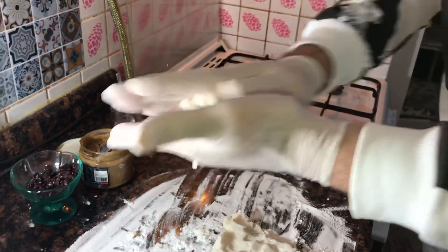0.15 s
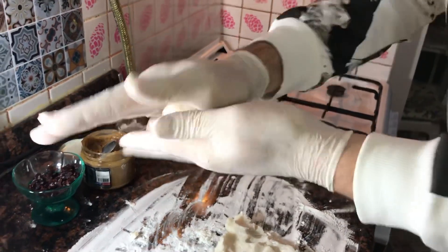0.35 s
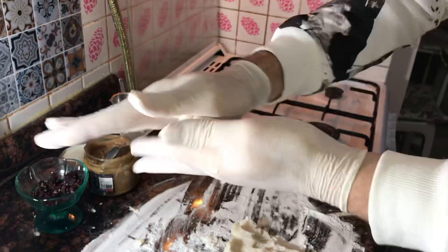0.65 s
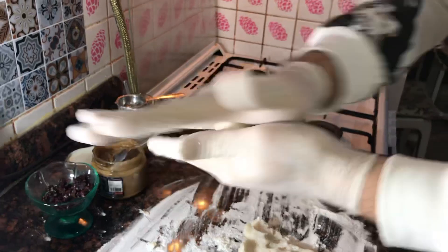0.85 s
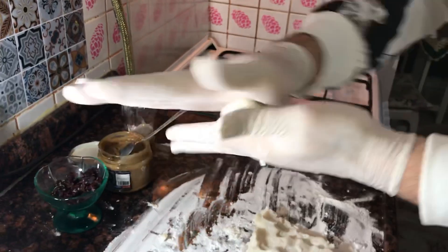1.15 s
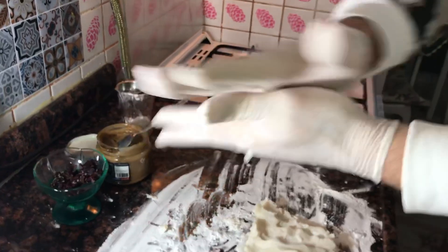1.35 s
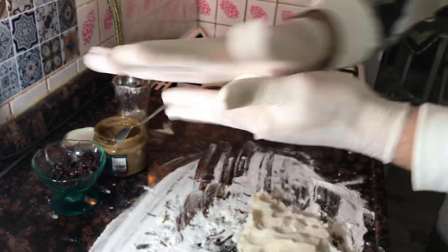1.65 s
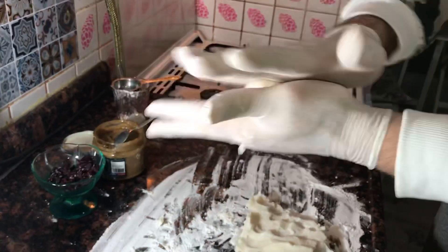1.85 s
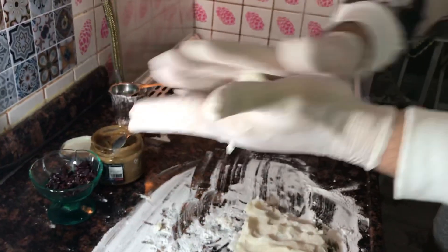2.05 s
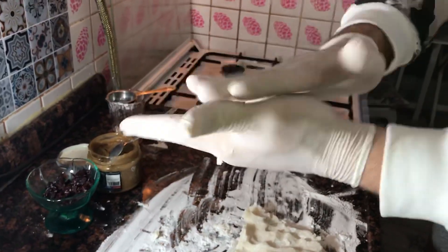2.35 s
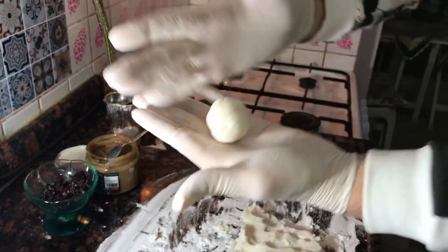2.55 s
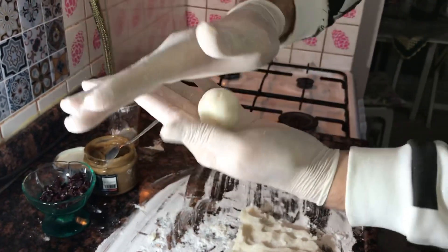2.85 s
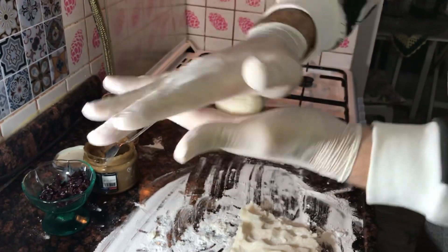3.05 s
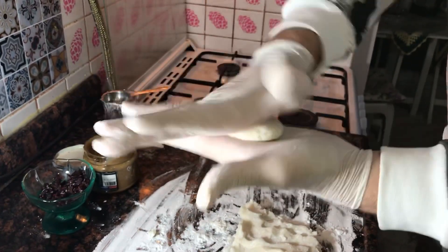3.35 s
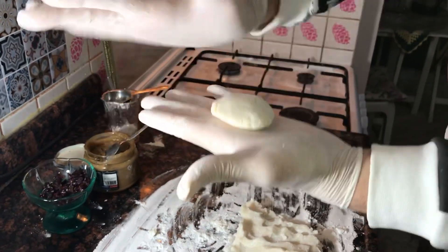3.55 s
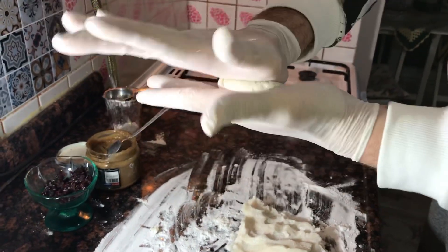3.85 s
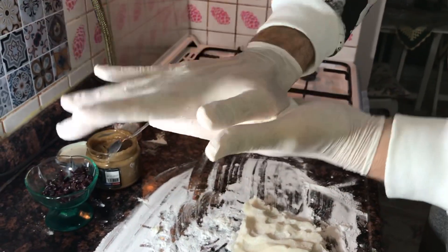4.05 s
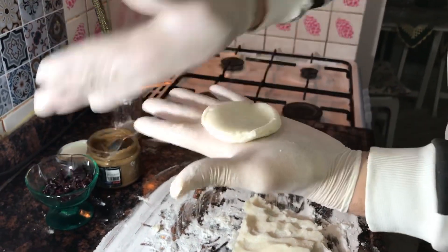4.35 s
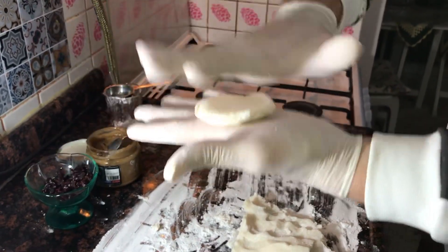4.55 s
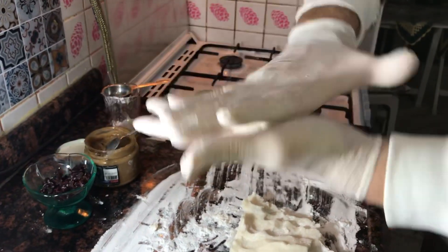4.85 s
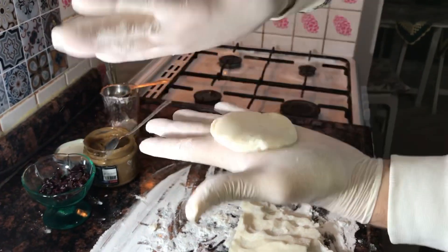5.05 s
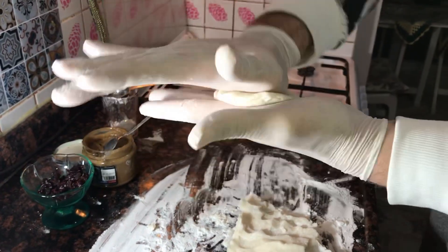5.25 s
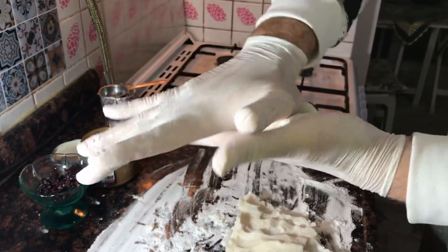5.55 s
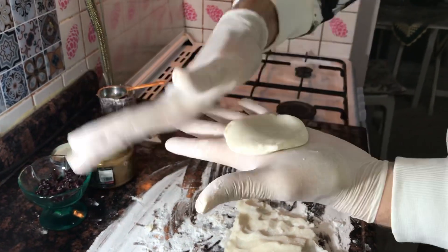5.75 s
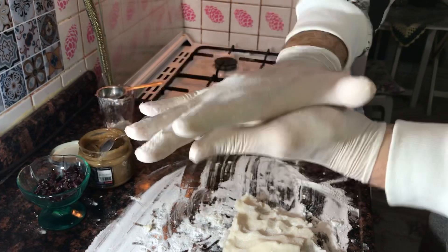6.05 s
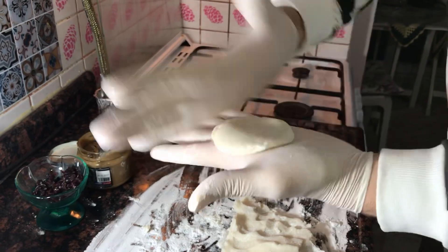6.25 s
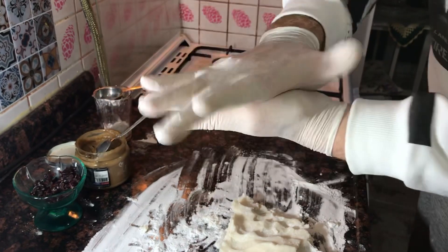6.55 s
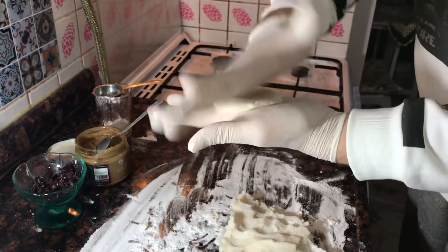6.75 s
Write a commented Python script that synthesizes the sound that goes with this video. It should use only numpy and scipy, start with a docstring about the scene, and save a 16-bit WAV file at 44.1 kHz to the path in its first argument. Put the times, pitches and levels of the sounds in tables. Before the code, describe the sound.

Thin rubber gloves softly rustle against sticky dough, followed by light pats and small peeling snaps in a quiet room.

```python
"""Gloved hands working dough

A small tiled kitchen, one microphone close to the hands. Thin rubber gloves roll a ball of sticky
dough, rubbing, clinging and peeling away in fine crackle, then pat it flat, each pat trapping a
pocket of air between the palms. Behind them lie quiet room noise, a mains hum and a low drone
that slowly sinks and fades."""
import sys
import numpy as np
from scipy import signal
from scipy.fft import rfft, irfft, next_fast_len
from scipy.io import wavfile
from scipy.ndimage import uniform_filter1d, map_coordinates

SR = 44100
rng = np.random.default_rng(int(sys.argv[2]) if len(sys.argv) > 2 else 0)


def unload_wav(signal):
    """Save mono or channel-first audio to the path in sys.argv[1] as 16-bit WAV at rate SR, clipped to [-1, 1]."""
    wavfile.write(
        sys.argv[1],
        SR,
        np.round(np.clip(np.atleast_2d(signal).T, -1, 1) * 32767).astype(np.int16),
    )


N = 304718
TIME = np.arange(N) / SR
TOP_HZ = 15950  # the microphone's band limit


# the rolling hand turns back: (time [s])
ROLL_TURNS = [-.08, .15, .375, .63, .905, 1.27, 1.45, 1.715, 1.965, 2.19, 2.46]
# the upper glove slides as it presses or lifts off: (start [s], length [s], level [dB])
SLIDES = [(0, 0.15, -50.5), (.65, 0.038, -53), (1.04, .08, -54), (1.795, .03, -56), (2.93, 0.095, -62),
          (3.145, 0.11, -58), (3.335, 0.15, -63.5), (3.75, 0.13, -73), (4.135, 0.064, -50),
          (4.22, 0.022, -54), (4.64, 0.075, -61), (4.795, 0.037, -55.5), (5.31, 0.13, -62),
          (5.515, 0.14, -53), (6.12, 0.12, -59.5), (6.685, 0.022, -57)]
ROLL_END_S = 2.43

def friction_db():
    """The rub drops at each turn of the hand and eases as the ball gets smooth; single slides join it."""
    start_db, turn_db = -53, -9
    ease, rise, fall = 3.0, 315, 222  # dB/s
    stroke = np.interp(TIME, ROLL_TURNS, np.arange(len(ROLL_TURNS)))
    slowness = (1 - np.abs(np.sin(np.pi * stroke))) ** 1.66
    rolling = start_db - ease * TIME + turn_db * slowness
    rolling -= fall * np.maximum(TIME - ROLL_END_S, 0)
    return np.maximum(rolling, held(SLIDES, rise, fall))


# rubber sliding on dough, heard close: (frequency [Hz], level [dB])
SLIDE_SPECTRUM = [(60, -42.5), (200, -42.5), (550, -2), (900, -4), (2000, -1), (4200, 1), (5000, -1),
                  (6000, 0), (7500, -3.5), (9000, -1), (10300, -5.5), (12300, -2), (16000, -4.5)]

def rubbing():
    """The glove slides on the dough in a fine rustle of little catches."""
    catches = coloured(grains(N, per_s=2400, spread_db=3.5), SLIDE_SPECTRUM)
    rustle = patchy(catches, depth_db=2.5)
    grip_db = 1.8 * wobble(55)
    return rustle * amp(friction_db() - 3.0 + grip_db)


def clings(count=32, half_s=0.0039, tilt_db=-0.5):
    """The rolling ball clings and lets go at random moments: faint peels that follow the rub's level."""
    times = ROLL_END_S * (np.arange(count) + rng.random(count)) / count
    levels = np.interp(times, TIME, friction_db())
    return [(s, db, half_s, tilt_db) for s, db in zip(times, levels)]


# glove rubber letting go: (frequency [Hz], level [dB])
RUBBER_SPECTRUM = [(60, -58), (200, -12), (450, -26), (900, -13.5), (2000, -4.5), (4200, 2.5), (5000, -2.5),
                   (5800, 2), (7500, -2.5), (9000, 0), (10300, -4.5), (12300, 2), (16000, -6.5)]
# rubber peels off dough: (peak time [s], level [dB], half length [s], brightness [dB/octave])
PEELS = [(0.052, -37, 0.0024, -1.5), (0.194, -44.5, 0.0074, 4), (0.259, -43, 0.018, 1.5),
         (0.324, -50, 0.017, -3), (0.423, -45.5, 0.014, 1.5), (0.477, -44, 0.0069, 1.5),
         (0.518, -48.5, 0.011, 0.5), (0.56, -42, 0.013, 5), (0.748, -48, 0.01, 4),
         (0.775, -42.5, 0.011, -1.5), (0.833, -51, 0.0052, 5), (0.951, -46, 0.0022, 10),
         (1.23, -51.5, 0.0066, -0.5), (1.503, -46, 0.0042, 3.5), (1.668, -57, 0.011, -3.5),
         (1.754, -54, 0.0056, 3), (1.865, -51, 0.0053, 1), (1.91, -52.5, 0.0051, -5.5),
         (2.137, -54, 0.019, -0.5), (2.234, -48.5, 0.008, 1.5), (2.257, -39, 0.0076, 6.5),
         (2.34, -55, 0.011, 2.5), (2.41, -61, 0.0066, 20), (2.482, -66, 0.011, 3),
         (2.887, -57.5, 0.0064, -2), (3.327, -48.5, 0.0085, -1), (3.353, -48.5, 0.016, 1),
         (3.645, -58.5, 0.0054, -5.5), (4.119, -47.5, 0.011, -2.5), (4.17, -44, 0.0043, 4),
         (4.288, -60, 0.0065, 14), (4.845, -49, 0.0063, -3), (4.8585, -26, 0.0021, 6),
         (5.509, -53.5, 0.0079, 8), (5.59, -41.5, 0.0059, 3), (5.637, -45.5, 0.017, 2.5),
         (6.152, -44, 0.0043, 0), (6.178, -48, 0.0045, 12), (6.207, -49, .002, 11),
         (6.219, -43, 0.0037, -1.5), (6.691, -54.5, 0.0055, -5.5), (6.711, -53.5, 0.0084, 8)]

def peels():
    """The contact patch tears open in a swell of crackle; fine threads of dough sound brighter."""
    out, t = np.zeros(N), np.arange(-SR // 10, SR // 10) / SR
    for s, db, half_s, tilt_db in PEELS + clings():
        breaks = grains(len(t), per_s=14000, spread_db=3.0)
        crackle = patchy(coloured(breaks, RUBBER_SPECTRUM, tilt_db), depth_db=3.0)
        swell = 1 / np.cosh(np.clip(1.38 * t / half_s, -50, 50))
        add(out, s + t[0], amp(db) * crackle * swell)
    return out


# taut rubber lets go at once: (time [s], peak [dB], brightness [dB/octave])
SNAPS = [(0.05, -45, -10), (0.24, -35.5, -7), (.396, -39, -4.5), (.765, -31, -2), (.951, -41, 6),
         (1.502, -40, 1.5), (2.2255, -39, 4), (2.2517, -37, -1), (3.3679, -28, -1), (4.105, -39, -3.5),
         (4.151, -21, -3), (4.181, -28, -3), (4.858, -13, -3), (4.892, -31.5, -7.5), (5.585, -36.5, -8.5),
         (5.655, -25, -6.5), (6.217, -18, 17.5), (6.503, -18.5, 1.5), (6.8332, -42.5, -13)]

def snaps(t60=0.0072):
    """The last bond breaks and the rubber flicks back within a millisecond or two."""
    out, t = np.zeros(N), np.arange(SR // 20) / SR
    middle = len(t) // 2
    for s, db, tilt_db in SNAPS:
        burst = rng.standard_normal(len(t)) * amp(-60 * t / t60)
        flick = coloured(np.roll(burst, middle), RUBBER_SPECTRUM, tilt_db)
        add(out, s - t[middle], amp(db) * flick / np.abs(flick).max())
    return out


# air between the palms: (frequency [multiple of the lowest mode], level [dB])
POCKET_MODES = [(1, -4.5), (1.3, -6), (1.74, -12)]

def air_pocket(hz, lowest_hz, step_db, q=5):
    """Response of the trapped air, ringing in a few broad modes."""
    return sum(amp(db + k * step_db) * np.abs(resonance(hz, m * lowest_hz, m * lowest_hz / q)) ** 2
               for k, (m, db) in enumerate(POCKET_MODES))


# a gloved palm's slap: (frequency [Hz], level [dB])
PALM_SPECTRUM = [(60, -45), (220, -4), (500, -9.5), (850, 2), (1200, -3), (1650, 2.5), (2000, -1),
                 (4500, -10.5), (6000, -12.5), (8000, -10.5), (16000, -23)]
# palm meets dough: (time [s], slap level [dB], finger lead [s], pocket pitch [Hz], pocket gain [dB],
# step per higher mode [dB], thump peak [dB], thump pitch [Hz], slap t60 [s])
PATS = [(4.562, -33.5, 0.0068, 2840, 7, 0, -38, 136, 0.034),
        (4.859, -22, 0.0074, 3280, 13.5, 2.5, -38.5, 330, 0.028),
        (5.173, -40, 0.0053, 2420, 10.5, -2, -66, 200, 0.01),
        (5.926, -34.5, 0.0048, 1660, 5, -5.5, -30.5, 227, 0.041),
        (6.499, -29.5, 0.0049, 2420, 10.5, -0.5, -35, 202, 0.052),
        (6.68, -53, 0.0023, 2800, 18, 1, -59, 200, .09)]

def pats(fingers_db=-16, shut_s=0.019, push_s=0.00047, dough_q=0.8):
    """Fingers touch first, then the palm shuts on an air pocket and gives the soft dough a dull push."""
    out, t = np.zeros(N), np.arange(-SR // 50, SR // 5) / SR
    for s, db, lead_s, pocket_hz, pocket_db, step_db, thump_db, thump_hz, t60 in PATS:
        pocket = lambda hz: amp(pocket_db) * air_pocket(hz, pocket_hz, step_db)
        noise = rng.standard_normal(len(t))
        slap = unit(filtered(noise, lambda hz: amp(along(PALM_SPECTRUM, hz)) + pocket(hz)))
        closing = (t > -lead_s) * np.maximum(amp(fingers_db), amp(-60 * np.abs(t) / shut_s))
        slap *= np.where(t < 0, closing, amp(-60 * np.abs(t) / t60))
        push = np.exp(-(t / push_s) ** 2)
        thump = filtered(push, lambda hz: resonance(hz, thump_hz, thump_hz / dough_q))
        add(out, s + t[0], amp(db) * slap + amp(thump_db) * thump / np.abs(thump).max())
    return out


# the rip of a lifting palm: (frequency [Hz], level [dB])
TEAR_SPECTRUM = [(60, -45), (300, -18), (650, -12), (900, -6.5), (1400, -2), (2200, 2.5), (3200, -3.5),
                 (4200, 1.5), (6100, 1), (7200, -6), (9000, -6), (10400, -7.5), (12300, -2), (16000, -12)]
# the whole palm tears off the dough: (peak time [s], level [dB], rise [s], fall [s], rasp [Hz])
LIFTS = [(4.152, -35, 0.0087, 0.023, 5600), (4.199, -38, 0.011, 0.0064, 4620),
         (5.632, -41, 0.015, 0.015, 2150), (5.654, -37.5, 0.0075, 0.0085, 4800)]

def lifts(rasp_db=-5, rasp_q=6.8):
    """The palm comes off in one dense rip that rasps at the pitch of the stretched rubber."""
    out, t = np.zeros(N), np.arange(-SR // 10, SR // 5) / SR
    for s, db, rise, fall, rasp_hz in LIFTS:
        rip = coloured(grains(len(t), per_s=15000, spread_db=4.0), TEAR_SPECTRUM)
        rip = filtered(rip, lambda hz: 1 + amp(rasp_db) * resonance(hz, rasp_hz, rasp_hz / rasp_q))
        swell = np.exp(-np.abs(t) / np.where(t < 0, rise, fall))
        add(out, s + t[0], amp(db) * patchy(rip, depth_db=2.0) * swell)
    return out


# tiny air pockets burst under the rubber: (time [s], level [dB], pitch [Hz], ring t60 [s])
POPS = [(0.24, -43.5, 1700, 0.05), (0.324, -37, 4100, .009), (0.396, -42.5, 4670, .012),
        (.471, -38, 654, 0.0058), (0.765, -39.5, 2320, 0.022), (1.858, -41.5, 6100, 0.0082),
        (2.883, -49.5, 3220, 0.042), (3.329, -33, 4100, 0.0096), (3.3706, -26.5, 3150, 0.0042),
        (3.775, -51.5, 9500, .012), (3.804, -51.5, 8900, 0.011), (4.15, -45.5, 675, 0.051),
        (4.2, -43.5, 400, 0.014)]

def pops(count=60):
    """Each air pocket ticks and rings briefly; rubbing bursts faint ones at random."""
    out, t = np.zeros(N), np.arange(SR // 12) / SR
    rub_db = friction_db()
    faint = [(when * TIME[-1], rub_db[int(when * N)] + 3.0 + 7 * force, 2000 * 5.1 ** pitch, 0.005)
             for when, force, pitch in rng.random((count, 3))]
    for s, db, hz, t60 in POPS + faint:
        ring = np.sin(2 * np.pi * hz * t) * amp(-60 * t / t60)
        tick = 0.23 * rng.standard_normal(len(t)) * amp(-60 * t / 0.016)
        add(out, s, amp(db) * (ring + tick))
    return out


# bands of thin hiss: (centre [Hz], width [Hz], level [dB])
HISS_BANDS = [(2400, 650, -74.5), (5950, 500, -82)]

def thin_hiss(start_s=2.54, end_s=2.83):
    """A faint hiss in two narrow bands while the hands are apart."""
    hiss = np.zeros(N)
    for centre, width, db in HISS_BANDS:
        band = filtered(rng.standard_normal(N), lambda hz: resonance(hz, centre, width) ** 2)
        hiss += amp(db) * unit(band)
    return hiss * amp(held([(start_s, end_s - start_s, 0)], rise=90, fall=90))


# decay of the tiled room: (frequency [Hz], t60 [s])
KITCHEN_DECAY = [(150, 0.24), (600, 0.25), (2000, 0.26), (4000, 0.25), (8000, 0.21), (15000, 0.15)]

def kitchen(direct, early_db, tail_db):
    """Counter and tiles send the microphone a few quick echoes, then a short bright tail."""
    hz, t, bands = signal.stft(rng.standard_normal(SR // 2), SR, nperseg=256)
    decay = amp(-60 * t / along(KITCHEN_DECAY, hz)[:, None])
    tail = signal.istft(bands * decay, SR, nperseg=256)[1]
    colour = [(200, 8.5), (1000, 5.0), (3700, -2.0), (7000, 1.0), (15000, -3.0)]
    tail = filtered(tail, lambda f: amp(along(colour, f)))
    response = amp(tail_db) * tail / np.linalg.norm(tail)
    echo_delays = rng.integers(SR // 600, SR // 70, size=14)
    response[echo_delays] += amp(early_db) * rng.choice([-1, 1], len(echo_delays))
    return direct + signal.fftconvolve(direct, response)[:N]


# the distant drone swells and fades: (time [s], level [dB])
DRONE_LEVEL = [(.35, -64), (1.15, -53), (2.3, -54.5), (3.0, -59.5), (3.9, -63.5), (5.0, -73.5), (5.45, -63),
               (6.2, -77)]
# it drops away briefly: (time [s], level change [dB])
DRONE_DIPS = [(1.44, -15), (2.79, -9), (3.5, -8.5)]

def drone(start_hz=143.9, sink_hz_per_s=2.1, dip_half_s=0.12):
    """A low, slowly sinking tone, like a motor beyond the walls."""
    pitch = start_hz - sink_hz_per_s * TIME + 0.5 * wobble(13)
    phase = 2 * np.pi * np.cumsum(pitch) / SR
    db = np.interp(TIME, *np.transpose(DRONE_LEVEL))
    db += sum(dip * np.exp(-((TIME - s) / dip_half_s) ** 2) for s, dip in DRONE_DIPS)
    return amp(db + 1.3 * wobble(23.22)) * np.sqrt(2) * np.sin(phase)


def mains_hum(hz=49):
    """A low electrical hum in the room, wavering in level and pitch."""
    gain = amp(-70.0 + wobble(3.8))
    return gain * np.sqrt(2) * np.sin(2 * np.pi * hz * TIME + 1.27 * wobble(5.2))


# the quiet kitchen at the microphone: (frequency [Hz], level [dB])
ROOM_SPECTRUM = [(25, -36.5), (40, 5.5), (60, -5), (80, -4), (100, 2), (170, -6), (340, -8), (600, -15.5),
                 (1200, -19.5), (2500, -24.5), (4800, -26.5), (6000, -26.5), (7500, -29.5), (16000, -32)]

def room_tone():
    """Soft, low room noise that drifts slightly in level."""
    drift_db = 0.6 * wobble(2.4)
    return amp(-63.0 + drift_db) * coloured(rng.standard_normal(N), ROOM_SPECTRUM)


def grains(size, per_s, spread_db):
    """Tiny adhesions break at random moments, a few much larger than the rest."""
    breaks = rng.random(size) < per_s / SR
    signs = rng.choice([-1, 1], size)
    return breaks * signs * amp(spread_db * np.minimum(rng.exponential(size=size), 4))


def patchy(x, depth_db):
    """Shifting folds of rubber favour one narrow band after another, each for a moment."""
    bands = signal.stft(x, nperseg=512)[2]
    folds = uniform_filter1d(rng.standard_normal(bands.shape), size=6, axis=0)
    folds = uniform_filter1d(folds, size=5, axis=1)
    return unit(signal.istft(bands * amp(depth_db * unit(folds)), nperseg=512)[1][:len(x)])


def coloured(x, spectrum, tilt_db=0):
    """x with a spectrum, tilted per octave through the mids and treble and free of rumble, at rms 1."""
    octaves = lambda hz: np.log2(np.clip(hz, 700, 11500))
    band = lambda hz: (1 - 1 / (1 + (hz / 33) ** 10)) * (hz < TOP_HZ)
    return unit(filtered(x, lambda hz: band(hz) * amp(along(spectrum, hz) + tilt_db * octaves(hz))))


def filtered(x, response):
    """x through a frequency response."""
    size = next_fast_len(len(x) + 4096)
    return irfft(rfft(x, size) * response(np.fft.rfftfreq(size, 1 / SR)), size)[:len(x)]


def resonance(hz, centre, width):
    """Response of one damped mode."""
    return 1j * hz * width / (centre ** 2 - hz ** 2 + 1j * hz * width)


def held(gestures, rise, fall):
    """Level in dB of gestures that rise, hold and fall, the slopes in dB/s."""
    return np.max([db - rise * np.maximum(s - TIME, 0) - fall * np.maximum(TIME - s - length, 0)
                   for s, length, db in gestures], axis=0)


def wobble(rate):
    """A smooth random curve, rate knots a second."""
    return map_coordinates(rng.standard_normal(4096), [TIME * rate], mode="wrap")


def along(points, hz):
    """A curve read on a log frequency axis."""
    freqs, values = np.transpose(points)
    return np.interp(np.log(hz + 1), np.log(freqs), values)


def amp(db):
    """Decibels to gain."""
    return 10 ** (np.asarray(db) / 20)


def unit(x):
    """x at rms 1."""
    return x / np.sqrt(np.mean(x ** 2) + 1e-20)


def add(track, s, sound):
    """Mix a sound into the track from time s."""
    start = round(s * SR)
    part = sound[max(-start, 0):max(N - start, 0)]
    track[max(start, 0):][:len(part)] += part


def scene():
    """The hands close to the microphone, the tiled kitchen around them, in mono."""
    rolling = kitchen(rubbing() + pops(), early_db=-19.5, tail_db=-9.5)
    peeling = kitchen(peels() + lifts(), early_db=-33, tail_db=-10.5)
    snapping = kitchen(snaps(), early_db=-21.5, tail_db=-10.0)
    patting = kitchen(pats(), early_db=-42, tail_db=-9.0)
    hands = rolling + peeling + snapping + patting
    return (hands + thin_hiss() + room_tone() + mains_hum() + drone())[None]


def record(dry):
    """The microphone keeps nothing above its band limit."""
    return np.array([filtered(channel, lambda hz: hz < TOP_HZ) for channel in dry])


dry = scene()
out = record(dry)
unload_wav(out)
```